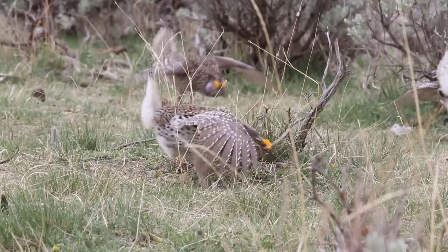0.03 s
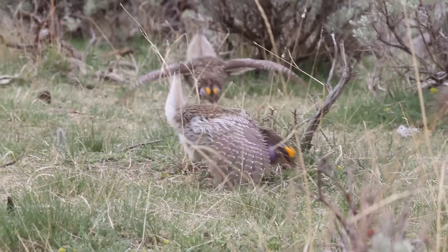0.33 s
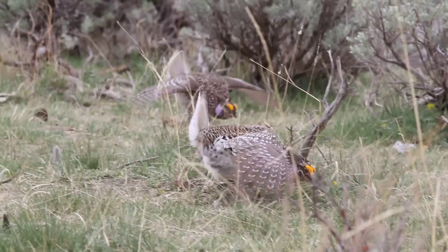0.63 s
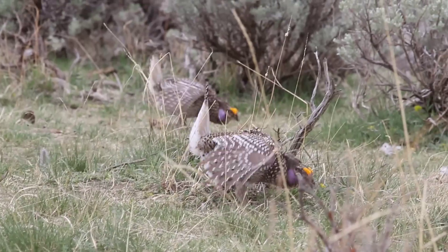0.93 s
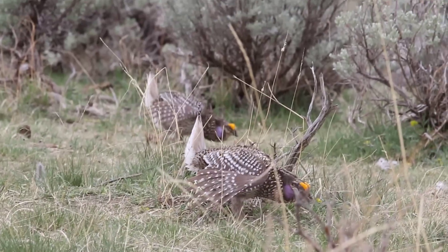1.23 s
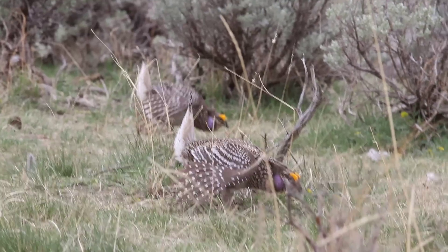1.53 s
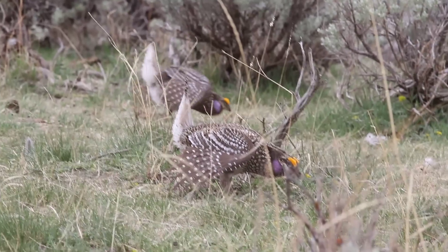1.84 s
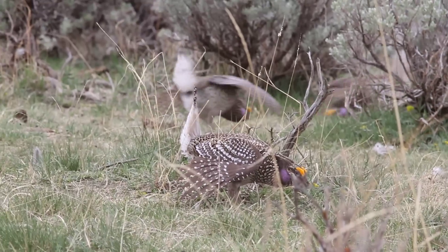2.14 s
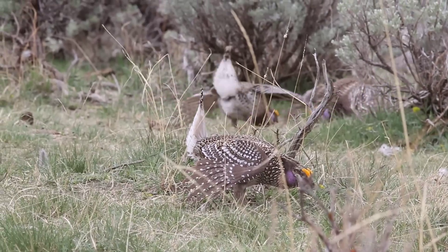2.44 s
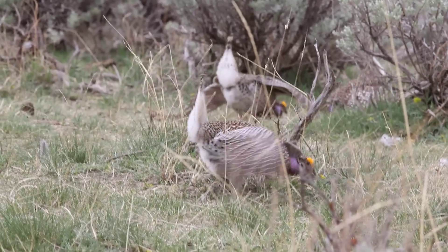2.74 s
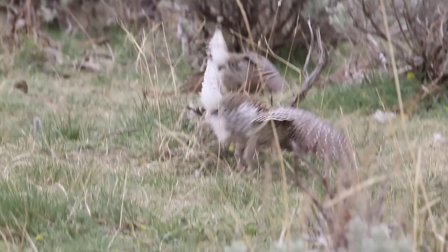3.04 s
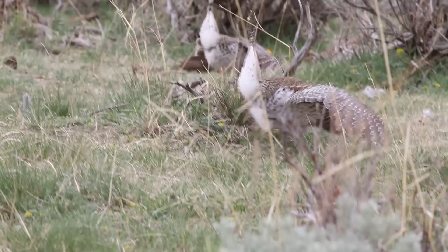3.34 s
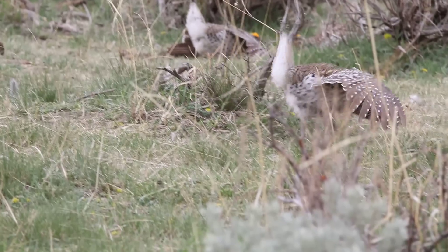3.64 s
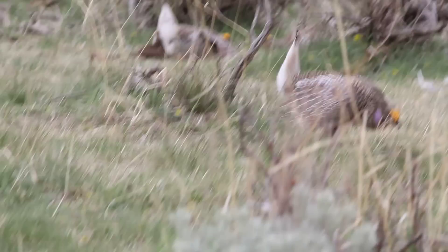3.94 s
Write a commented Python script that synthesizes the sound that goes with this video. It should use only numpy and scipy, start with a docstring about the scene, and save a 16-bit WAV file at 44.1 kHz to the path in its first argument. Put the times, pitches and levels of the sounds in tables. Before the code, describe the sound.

Grouse dance on open grassland, rapidly stamping the turf while their tail feathers click and rustle. Short clucks, thin squeaks and a few low hoots come through. The dance eases midway, then picks up again over soft wind.

```python
"""Sharp-tailed grouse dance on open grassland, drumming the turf about twenty times a second. Each footfall is
an impact on a damped spring; tail feathers click, zip and rustle by friction, a few dry stalks snap and quills
tick. The calls are harmonic tones: gliding clucks, most of them falling, thin squeaks, and low hoots shaped by
the throat and air sacs. A faint, high fizz pulses during the louder calls. Shrubs scatter a faint echo, over a
soft background of wind and distant hiss."""
import sys
import numpy as np
from scipy import signal
from scipy.fft import rfft, irfft
from scipy.io import wavfile
from scipy.ndimage import uniform_filter1d

SR = 44100
rng = np.random.default_rng(int(sys.argv[2]) if len(sys.argv) > 2 else 0)


def dump(signal):
    """Clip the signal to [-1, 1] and save it as 16-bit WAV at the path in sys.argv[1]."""
    limited = np.clip(np.atleast_2d(signal).T, -1, 1)
    pcm = np.round(limited * 32767).astype(np.int16)
    wavfile.write(sys.argv[1], SR, pcm)


N = 176400
T = np.arange(N) / SR

# Spectrum of a feather or grass scrape: frequency_hz, level_db
SCRAPE_SPECTRUM = [(500, -1), (1800, -4), (2700, 7), (3200, 0.5), (4700, 1.5), (6200, -2.5), (8500, -12),
                   (12000, -8.5), (16000, -18)]
# Spectrum of the rasp in a call: frequency_hz, level_db
RASP_SPECTRUM = [(300, -15), (700, 1.5), (1100, -1), (1500, 4.5), (2000, 3), (3000, -10.5), (6000, -13),
                 (16000, -26)]


def amp(db):
    """Converts decibels to an amplitude ratio."""
    return 10 ** (np.asarray(db) / 20)


def unit(x):
    """Normalises to rms 1."""
    return x / np.sqrt(np.mean(x ** 2) + 1e-20)


def spectrum_db(spectrum, hz):
    """Interpolates a spectrum on a log-frequency axis."""
    points_hz, db = np.transpose(spectrum)
    return np.interp(np.log(hz + 1), np.log(points_hz), db)


def colour(x, spectrum):
    """Filters by a spectrum and normalises to rms 1."""
    gain = amp(spectrum_db(spectrum, np.fft.rfftfreq(len(x), 1 / SR)))
    return unit(irfft(rfft(x) * gain, len(x)))


def contour(points):
    """Interpolates (time_s, level_db) points into a gain over the whole scene."""
    return amp(np.interp(T, *np.transpose(points)))


def add(mix, start_s, sound):
    """Superposes a sound on the mix."""
    part = mix[max(round(start_s * SR), 0):][:len(sound)]
    part += sound[:len(part)]


def drift(count, size):
    """Slow random variation of rms 1: noise averaged twice over `size` samples."""
    return unit(uniform_filter1d(uniform_filter1d(rng.standard_normal(count), size), size))


def jittered_phase(hz, jitter, size=90):
    """Phase is the integral of frequency, which here wavers by the rms fraction `jitter`."""
    shake = unit(uniform_filter1d(rng.standard_normal(len(hz)), size))
    return 2 * np.pi * np.cumsum(hz * (1 + jitter * shake)) / SR


def flutter(count, rasp_db):
    """Random amplitude modulation of a voice, deeper in raspier calls."""
    depth_db = 6 * amp(min(rasp_db, -6))
    return unit(amp(depth_db * drift(count, size=110)))


def wind(level_db=-46, patch_db=1.5):
    """Wind and distant hiss are broadband noise whose level drifts in time and frequency."""
    # Spectral density: frequency_hz, level_db
    spectrum = [(53, -42), (90, -19), (184, -1.5), (272, -3.5), (544, -14), (620, -17.5), (1140, -10.5),
                (1400, -8.5), (2040, -12.5), (2830, -22), (3360, -18.5), (3660, -7), (4360, -27),
                (5530, -24), (8000, -26.5), (16000, -33.5)]
    hz, _, bands = signal.stft(rng.standard_normal(N), SR, nperseg=1024)
    patches = uniform_filter1d(rng.standard_normal(bands.shape), size=8, axis=0)
    patches = unit(uniform_filter1d(patches, size=8, axis=1))
    bands *= amp(spectrum_db(spectrum, hz)[:, None] + patch_db * patches)
    return amp(level_db) * unit(signal.istft(bands, nperseg=1024)[1][:N])


def wind_rumble():
    """Wind rumble is low-frequency noise under a slow envelope."""
    # Envelope: time_s, level_db
    levels = [(.5, -63), (1.8, -94), (2.3, -62.5), (3.9, -57)]
    # Spectrum: frequency_hz, level_db
    spectrum = [(20, -22), (45, -6), (72, 2), (105, 2), (250, -38)]
    return contour(levels) * colour(rng.standard_normal(N), spectrum)


def whine():
    """Noise confined to narrow bands is heard as a faint, steady whine."""
    # Bands of high hiss: centre_hz, half_width_hz, level_db
    bands = [(5490, 120, -64), (14400, 200, -67), (15600, 200, -69)]
    out, hz = np.zeros(N), np.fft.rfftfreq(N, 1 / SR)
    for centre_hz, half_width_hz, db in bands:
        peak = 1 / (1 + ((hz - centre_hz) / half_width_hz) ** 2)
        out += amp(db) * unit(irfft(rfft(rng.standard_normal(N)) * peak, N))
    return out


def clucks(glide_rate=2.284, fade_db=-13.5):
    """A cluck is a harmonic series led by its third harmonic, in a glide that flattens out."""
    # Calls: start_s, length_s, level_db, lead_from_hz, lead_to_hz, others_db, rasp_db
    calls = [(.030, 0.033, -34, 1340, 1152, -3, -29), (.064, 0.022, -28.5, 1090, 816, -15, -7),
             (.114, 0.024, -26, 1920, 1686, -37, -27), (.285, 0.039, -45, 930, 1192, -25, -22),
             (.442, 0.055, -35.5, 1175, 956, -16, -21), (.492, 0.025, -42, 550, 818, -20, -24),
             (.556, 0.037, -31.5, 1090, 914, -25, -21), (.633, 0.015, -35.5, 1480, 1140, -14, -14),
             (.652, 0.033, -31.5, 1190, 1022, -23, -26), (.840, 0.024, -31, 1130, 1093, -33, -29),
             (.908, 0.018, -38, 1004, 1400, -27, -21), (.947, 0.021, -34, 1490, 1096, -31, -22),
             (1.194, 0.057, -28, 1425, 1098, -23, -11), (1.212, 0.013, -27.5, 1610, 1790, -18, -6),
             (1.220, 0.02, -30.5, 2300, 1995, -24, -16), (1.803, .018, -37, 2190, 1450, -25, -12),
             (2.057, 0.0372, -34, 1620, 1000, -15, -3), (2.257, 0.037, -32.5, 1374, 988, -23, -5.5),
             (2.805, 0.026, -38.5, 1720, 1670, -23, -17), (2.885, 0.071, -41, 1338, 1097, -7, -3),
             (3.106, 0.077, -23.5, 1733, 1004, -13.5, -14), (3.324, 0.021, -33, 1506, 1280, -5, -21),
             (3.335, 0.029, -26.5, 1278, 1047, -14, -7.5), (3.521, 0.055, -23, 1766, 1088, -14.5, -10),
             (3.858, 0.067, -36, 1585, 1180, -11, -3)]
    # Partials beside the lead: harmonic_number, level_db
    harmonics = [(1, -3.5), (2, -0.5), (4, -3), (5, -21), (6, -34)]
    out = np.zeros(N)
    for start_s, length_s, db, from_hz, to_hz, others_db, rasp_db in calls:
        count = round(length_s * SR)
        progress = np.arange(count) / (length_s * SR)
        glide = (np.exp(-glide_rate * progress) - np.exp(-glide_rate)) / (1 - np.exp(-glide_rate))
        lead_hz = (to_hz + (from_hz - to_hz) * glide) * (1 + .01 * drift(count, size=260))
        phase = jittered_phase(lead_hz, jitter=.027)
        others = sum(amp(partial_db) * np.cos(k * phase / 3) for k, partial_db in harmonics)
        rasp = colour(rng.standard_normal(count), RASP_SPECTRUM) * amp(1.5 - 24 * progress)
        voice = np.cos(phase) + amp(others_db) * others + amp(rasp_db) * rasp
        envelope = np.clip(progress / .078, 0, 1) * np.clip((1 - progress) / .15, 0, 1)
        envelope *= amp(fade_db * np.maximum(progress - .31, 0) ** 1.66)
        add(out, start_s, amp(db) * envelope * flutter(count, rasp_db) * voice)
    return out


def feather_rustle(scrapes_per_s=360, grain_s=.0034, spread_db=3, trim_db=-.5):
    """Many small feather scrapes at random moments sum to friction noise with a grainy envelope."""
    # Rustle envelope: time_s, level_db
    levels = [(.04, -42), (.4, -42), (.72, -38.5), (.85, -43.5), (1.15, -42), (1.45, -49.5), (1.7, -45.5),
              (2.05, -53.5), (2.55, -54), (2.8, -47.5), (3.1, -39), (3.5, -42.5), (3.95, -42.5)]
    onsets = rng.random(N) < scrapes_per_s / SR
    strengths = amp(spread_db * np.minimum(rng.exponential(1, N), 3))
    grains = signal.lfilter([1], [1, -np.exp(-1 / (grain_s * SR))], onsets * strengths)
    return amp(trim_db) * contour(levels) * colour(grains * rng.standard_normal(N), SCRAPE_SPECTRUM)


def turf_thud(t, hz, stretch=1, rise_s=.0044, fall_s=.0054, knock_hz=338, knock_s=.011):
    """Struck turf is a damped spring: a few cycles peaking at t = 0, with a faint higher knock."""
    envelope = np.exp(-(t / stretch / np.where(t < 0, rise_s, fall_s)) ** 2)
    swing = -np.cos(2 * np.pi * hz * t)
    swing -= np.average(swing, weights=envelope)  # no net pressure offset
    knock = amp(-24.5) * np.exp(-(t / knock_s) ** 2) * np.sin(2 * np.pi * knock_hz * t)
    return envelope * swing + knock


def feet(turf_hz=188.2, scuff_s=.0018, trim_db=-2.5, far_steps_per_s=70):
    """Impacts excite the turf: near stamps scuff the grass, and far ones merge into a patter."""
    # Near footfalls: peak_s, level_db
    stamps = [(0.0642, -30), (0.1324, -29.5), (0.168, -28), (0.183, -30.5), (0.242, -34), (0.2908, -31),
              (0.3121, -32.5), (0.3628, -30.5), (0.395, -30.5), (0.4116, -32), (0.4654, -26), (0.5655, -28),
              (0.605, -28.5), (0.6294, -33), (0.6653, -28), (0.7393, -36), (0.7784, -28), (0.826, -33.5),
              (0.8458, -37), (0.871, -32.5), (0.8976, -40), (0.9242, -30.5), (0.9494, -39), (0.9828, -30),
              (1.0262, -33), (1.052, -37), (1.0826, -37), (1.1289, -31), (1.2043, -28), (1.2807, -35),
              (1.3336, -35), (1.3816, -33), (1.398, -32), (1.435, -34), (1.45, -31), (1.5014, -27.5),
              (1.5525, -27.5), (1.604, -30), (1.6365, -38), (1.6603, -33), (1.766, -33.5), (1.82, -36),
              (1.8718, -34.5), (1.925, -33.5), (1.966, -39), (2.04, -34.5), (2.0796, -35), (2.1412, -35),
              (2.1757, -36), (2.2007, -35), (2.228, -37), (2.2597, -36), (2.3178, -36), (2.424, -40),
              (2.475, -35.5), (2.526, -35), (2.5783, -36), (2.669, -30), (2.7193, -28.5), (2.77, -30.5),
              (2.8196, -29.5), (2.8688, -28.5), (2.904, -33), (2.9199, -29), (2.9719, -32.5), (3.0056, -24),
              (3.1013, -27.5), (3.1434, -30), (3.1964, -29.5), (3.228, -31), (3.25, -29), (3.278, -33),
              (3.3011, -30), (3.325, -30.5), (3.3526, -25), (3.381, -29.5), (3.4031, -30), (3.436, -25),
              (3.5734, -28.5), (3.637, -32.5), (3.6778, -31.5), (3.7284, -29.5), (3.7828, -27),
              (3.832, -29), (3.855, -34.5), (3.8856, -31.5), (3.906, -34), (3.959, -33)]
    # Envelope of the distant footfalls: time_s, level_db
    far_levels = [(.1, -47), (.35, -43.5), (.65, -43.5), (1.2, -48), (1.45, -60), (2.6, -68), (2.9, -54),
                  (3.35, -44), (3.55, -51), (3.8, -48), (3.95, -55)]
    near, t = np.zeros(N), np.arange(-.02, .03, 1 / SR)
    pitches_hz = turf_hz * np.exp(.041 * rng.standard_normal(len(stamps)))
    for (peak_s, db), hz in zip(stamps, pitches_hz):
        scuff = np.exp(-abs(t) / scuff_s) * colour(rng.standard_normal(len(t)), SCRAPE_SPECTRUM)
        add(near, peak_s + t[0], amp(db + trim_db) * (turf_thud(t, hz) + amp(-6.5) * scuff))
    far_steps = 1. * (rng.random(N) < far_steps_per_s / SR)
    patter = signal.fftconvolve(far_steps, turf_thud(t, turf_hz, stretch=1.46), "same")
    return near + contour(far_levels) * unit(patter)


def quill_zips(width_s=.0018, sweep_hz_per_s=228500):
    """Sliding friction between quills gives brief rising chirps, each at its own sweep rate."""
    # Chirps: peak_s, level_db, centre_hz
    zips = [(0.069, -31, 6000), (.221, -26, 7270), (0.301, -29, 7200), (.372, -32, 7550), (.385, -35, 7300),
            (0.443, -25, 7450), (0.459, -28, 6200), (0.617, -24.5, 6920), (.653, -28, 6870),
            (.696, -33, 7300), (0.724, -31, 6500), (1.079, -30, 7600), (1.155, -25.5, 7000),
            (1.176, -26.5, 7150), (1.649, -31.5, 7100), (3.147, -25.5, 6900), (3.166, -33, 7560),
            (3.229, -28, 6170), (3.733, -27.5, 6800), (3.803, -31.5, 7740), (3.812, -30, 6150),
            (3.877, -28.5, 7300)]
    out, t = np.zeros(N), np.arange(-.008, .016, 1 / SR)
    envelope = np.exp(-(t / width_s) ** 2)
    for (peak_s, db, hz), speed in zip(zips, rng.uniform(.58, 1.45, len(zips))):
        phase = jittered_phase(hz + speed * sweep_hz_per_s * t, jitter=.051, size=12)
        add(out, peak_s + t[0], amp(db) * envelope * np.sin(phase))
    return out


def snaps_and_ticks():
    """Brittle fracture of dry stalks underfoot gives bright noise bursts that decay exponentially; the two
    longer-decaying bursts are quill ticks."""
    # Snaps and ticks: start_s, level_db, decay_s
    snaps = [(.0695, -36, 0.00035), (2.111, -38.5, .003), (2.244, -37, 0.004), (3.2273, -27, .0003),
             (3.9079, -17.5, 0.00023)]
    # Spectrum of a snap: frequency_hz, level_db
    spectrum = [(1500, 0), (5000, -10.5), (11000, 2), (16000, -8)]
    out, t = np.zeros(N), np.arange(512) / SR
    for start_s, db, decay_s in snaps:
        crack = colour(rng.standard_normal(len(t)), spectrum)
        add(out, start_s, amp(db) * np.exp(-t / decay_s) * crack)
    return out


def tail_clicks(rise_s=.0007, fall_s=.0014, ring_s=.00037, tilt_db_per_octave=-10):
    """Tail feathers snap past each other, giving friction noise and a brief quill resonance."""
    # Clicks: peak_s, level_db, centre_hz
    clicks = [(0.0701, -25, 4940), (0.162, -29, 3134), (0.2319, -21, 4500), (0.3864, -25, 5000),
              (0.399, -24.5, 4840), (0.4427, -26, 4430), (0.458, -24, 5200), (0.465, -23.5, 4480),
              (0.5231, -29, 5500), (0.5342, -22.5, 4640), (0.6303, -25, 4360), (0.6655, -24.5, 3889),
              (0.697, -22.5, 4600), (0.726, -23, 4860), (0.791, -30, 3300), (0.82, -30, 3740),
              (0.844, -25.5, 3100), (0.897, -25.5, 2950), (0.9214, -27, 3700), (0.9482, -23, 2980),
              (1.001, -26, 3230), (1.0517, -22.5, 3100), (1.093, -23, 5340), (1.1041, -21.5, 2960),
              (1.1681, -18, 5000), (1.207, -25.5, 4470), (1.2351, -17, 4900), (1.251, -25, 4665),
              (1.3304, -26, 2680), (1.348, -30, 4500), (1.3817, -25, 3620), (1.4328, -26.5, 2700),
              (1.4503, -30, 3792), (1.6633, -25.5, 4430), (1.8684, -27, 3700), (1.8917, -29, 3700),
              (1.9263, -31.5, 3660), (1.9652, -31, 3699), (2.2115, -30.5, 3640), (2.248, -34.5, 3377),
              (2.271, -31, 3397), (2.6269, -32.5, 3630), (2.6693, -30.5, 3240), (2.7187, -31, 3730),
              (2.754, -27.5, 3420), (2.8028, -25, 2950), (2.8534, -24.5, 3170), (2.904, -28, 3030),
              (2.9458, -27, 2930), (2.998, -25.5, 2940), (3.048, -24.5, 2980), (3.099, -23.5, 3280),
              (3.1617, -19.5, 4800), (3.18, -31, 4630), (3.229, -20.5, 4700), (3.24, -27.5, 4270),
              (3.3254, -24.5, 2940), (3.375, -26, 2900), (3.4274, -22.5, 2900), (3.4646, -25.5, 4050),
              (3.481, -24, 2900), (3.4946, -30, 3650), (3.532, -22, 3830), (3.5817, -22.5, 2800),
              (3.6322, -23, 3071), (3.677, -27.5, 3070), (3.684, -25.5, 2860), (3.746, -18.5, 4300),
              (3.8125, -21.5, 5000), (3.817, -24.5, 4400), (3.9063, -26, 3100), (3.9418, -31, 3650),
              (3.9568, -27, 3250)]
    out, t = np.zeros(N), np.arange(-.008, .016, 1 / SR)
    for peak_s, db, hz in clicks:
        crispness = hz / 3720  # higher clicks are shorter and peak more strongly
        envelope = np.exp(np.where(t < 0, t / rise_s, -t / fall_s) * crispness ** 2)
        ring = np.exp(-(t / ring_s) ** 2) * np.sin(2 * np.pi * hz * t)
        spectrum = [(band_hz, band_db + tilt_db_per_octave * abs(np.log2(band_hz / hz)))
                    for band_hz, band_db in SCRAPE_SPECTRUM]
        scrape = envelope * colour(rng.standard_normal(len(t)), spectrum)
        scrape *= np.linalg.norm(envelope) / np.linalg.norm(scrape)
        add(out, peak_s + t[0], amp(db) * crispness * (amp(-10.5) * ring + amp(-3.5) * scrape))
    return out


def hoots(rise_s=.0007, release_s=.0041, fade_db=-10.5, lift_s=.0126, sag_hz_per_s=450):
    """Source and filter: the throat and air sacs shape harmonics whose pitch drops, sags and lifts."""
    # Calls: start_s, length_s, level_db, from_hz, held_hz, lift_hz, settle_s, third_db, rasp_db
    calls = [(.734, 0.094, -27, 787, 380, 140, 0.0055, -0.5, -17),
             (.986, 0.044, -42, 480, 306, 89, 0.014, 11.5, -6),
             (1.218, 0.06, -26.5, 478, 333, 10, 0.0092, -1.5, -7),
             (1.256, .066, -25, 811, 363, 184, .0105, -2.5, -29),
             (1.706, 0.071, -27.5, 601, 349, 79, 0.016, 8, -5),
             (1.772, 0.064, -37.5, 452.5, 281, 170, 0.025, 11, -9)]
    # Response of the throat and air sacs: frequency_hz, gain_db
    throat = [(290, -37), (360, -4), (420, -12.5), (600, -18.5), (780, -3), (950, -2.5), (1200, -0.5),
              (1500, -5), (1900, -21.5), (2600, -38), (4000, -22)]
    out = np.zeros(N)
    for start_s, length_s, db, from_hz, held_hz, lift_hz, settle_s, third_db, rasp_db in calls:
        t = np.arange(0, length_s, 1 / SR)
        hz = held_hz + (from_hz - held_hz) * np.exp(-t / settle_s)
        hz -= sag_hz_per_s * (t - length_s / 2)
        hz += lift_hz * np.exp(-((length_s - t) / lift_s) ** 2)
        phase = jittered_phase(hz, jitter=.028)
        emphasis_db = {1: third_db / 2, 3: third_db}
        voice = np.zeros(len(t))
        for k in range(1, 9):
            gain = amp(spectrum_db(throat, k * hz) + emphasis_db.get(k, 0))
            voice += gain * np.cos(k * phase + rng.uniform(0, np.pi))
        puffs = rng.standard_normal(len(t)) * (1 + np.cos(phase))  # one puff of noise per cycle
        voice += amp(rasp_db) * colour(puffs, RASP_SPECTRUM)
        envelope = np.minimum(t / rise_s, 1) * np.minimum((length_s - t) / release_s, 1)
        envelope *= amp(fade_db * t / length_s)
        add(out, start_s, amp(db) * envelope * flutter(len(t), rasp_db) * voice)
    return out


def high_fizz(wander_hz=1000, pulse_hz=380, pulse_depth=.54):
    """Random frequency modulation spreads a high tone into a faint fizz, which pulses in amplitude."""
    # Bursts of fizz during the louder calls: start_s, length_s, level_db, centre_hz
    bursts = [(.735, 0.085, -49, 13100), (1.23, 0.11, -52, 12800), (1.70, 0.085, -48, 12600),
              (3.327, 0.026, -42, 9500)]
    out = np.zeros(N)
    for start_s, length_s, db, hz in bursts:
        t = np.arange(0, length_s, 1 / SR)
        phase = jittered_phase(hz + wander_hz * drift(len(t), size=70), jitter=.05, size=12)
        pulses = 1 + pulse_depth * np.cos(2 * np.pi * pulse_hz * t)
        add(out, start_s, amp(db) * np.sin(np.pi * t / length_s) * unit(np.sin(phase)) * pulses)
    return out


def squeaks(rise_fraction=.11):
    """A squeak is a rising tone of three harmonics, with a steeper roll-off at higher pitch."""
    # Calls: start_s, length_s, level_db, pitch_hz
    calls = [(1.168, 0.033, -40.5, 2780), (1.196, 0.016, -36, 2820), (1.238, 0.0114, -33.5, 4540),
             (1.690, 0.013, -27, 4680), (1.705, 0.024, -29.5, 2760), (1.732, 0.024, -39, 2770),
             (2.020, 0.051, -43.5, 2770), (2.224, 0.033, -44, 2800), (3.298, 0.029, -33, 2420),
             (3.836, 0.022, -33.5, 2320)]
    out = np.zeros(N)
    for start_s, length_s, db, hz in calls:
        progress = np.linspace(0, 1, round(length_s * SR))
        phase = jittered_phase(hz * (1 + rise_fraction * (progress - .5)), jitter=.019)
        step_db = -5.5 * (hz / 2400) ** 2
        tone = sum(amp(step_db * k) * np.sin((k + 1) * phase) for k in range(3))
        add(out, start_s, amp(db) * np.sin(np.pi * progress) * tone)
    return out


def shrub_echo(sound, level_db=-20, t60_s=.2, delay_s=.006):
    """Scattering from shrubs returns sparse reflections that decay exponentially."""
    t = np.arange(SR // 2) / SR
    reflections = rng.standard_normal(len(t)) * (rng.random(len(t)) < .05)
    response = reflections * amp(-60 * t / t60_s) * (t > delay_s)
    return amp(level_db) * signal.fftconvolve(sound, response / np.linalg.norm(response))[:N]


def scene():
    """The dance, its echo and the background superpose in one channel."""
    calls = clucks() + hoots() + squeaks()
    fizz = high_fizz()
    feathers = tail_clicks() + quill_zips() + feather_rustle()
    dance = calls + fizz + feathers + feet() + snaps_and_ticks()
    return (dance + wind_rumble() + shrub_echo(dance) + wind() + whine())[None]


def record(dry, start_s=.0347, low_cut_hz=55, band_limit_hz=16000):
    """After a moment of silence, the microphone's low cut and a band limit act as a band-pass."""
    opened = dry * np.clip((T - start_s) / .002, 0, 1)
    low_cut = signal.butter(2, low_cut_hz, "high", fs=SR, output="sos")
    band_limit = signal.firwin(511, band_limit_hz, window=("kaiser", 9), fs=SR)
    return signal.oaconvolve(signal.sosfilt(low_cut, opened), band_limit[None], "same")


dry = scene()
out = record(dry)
dump(out)
```